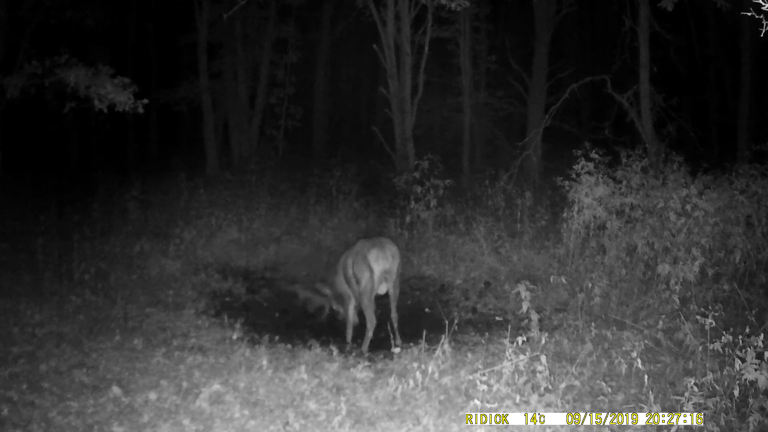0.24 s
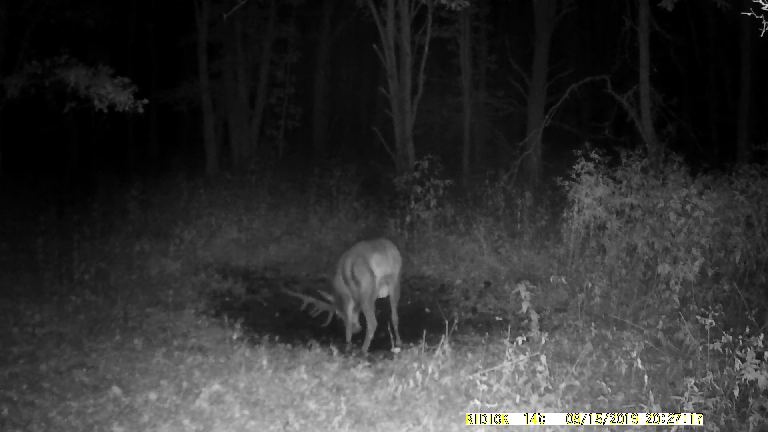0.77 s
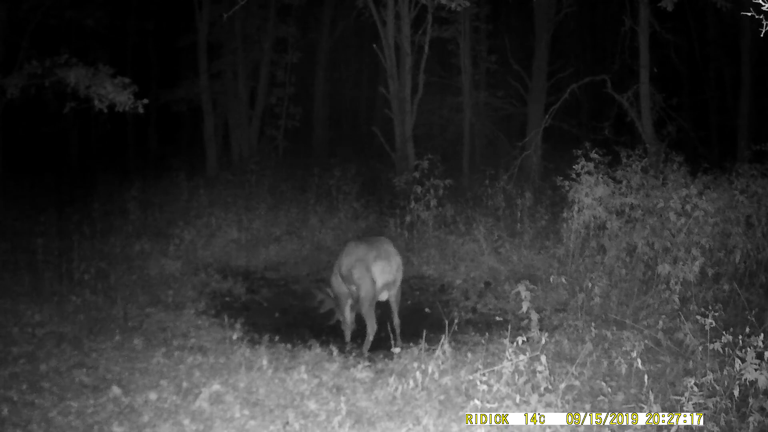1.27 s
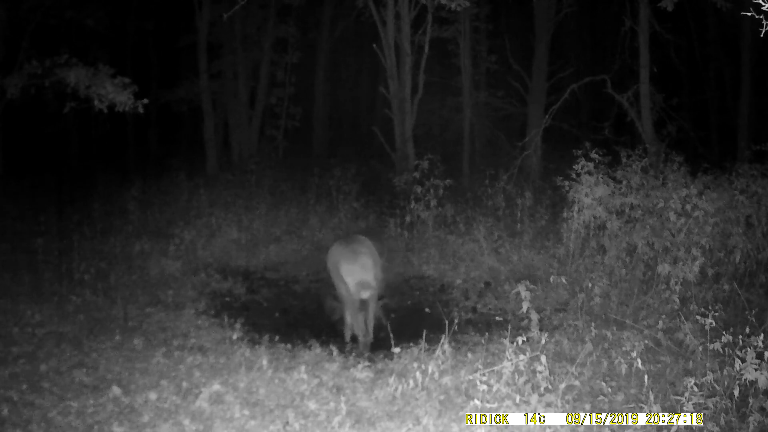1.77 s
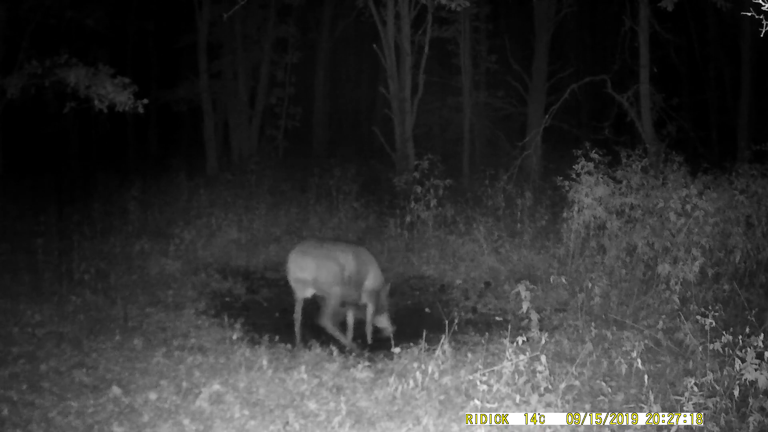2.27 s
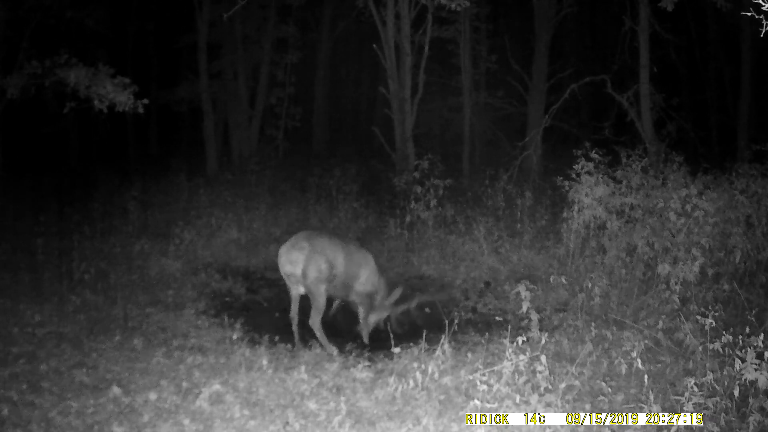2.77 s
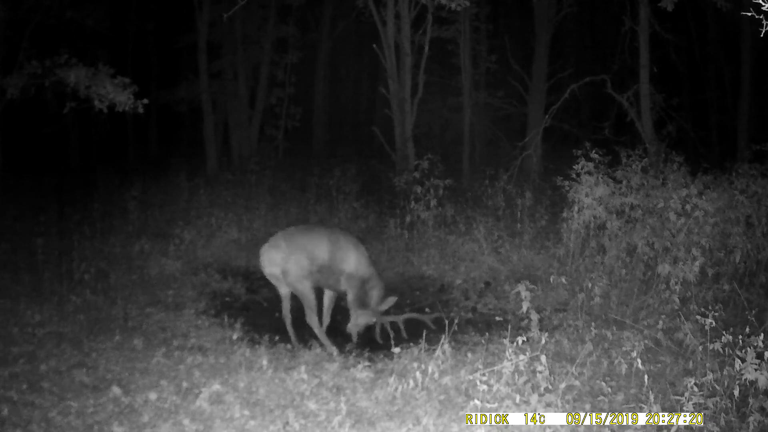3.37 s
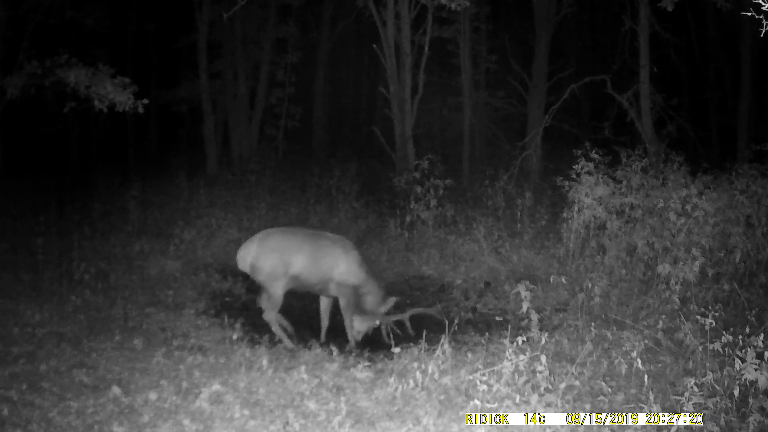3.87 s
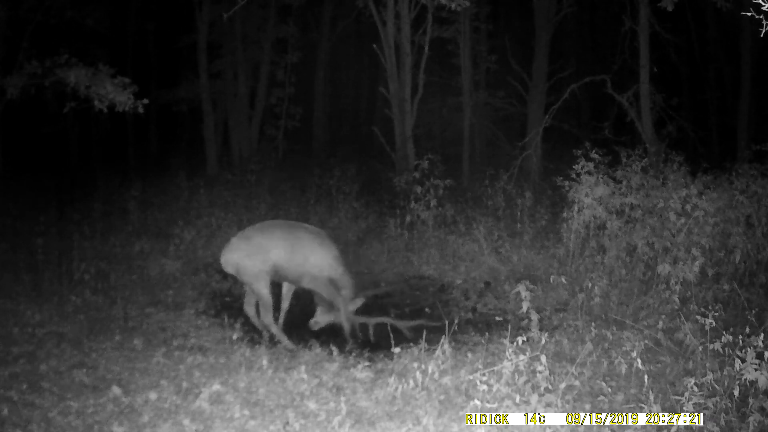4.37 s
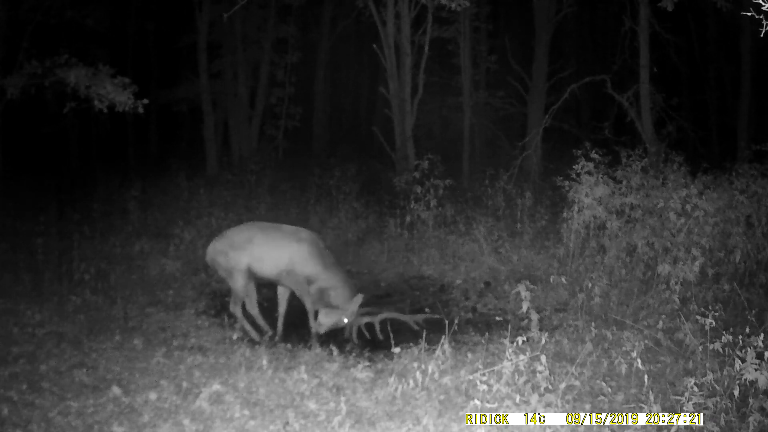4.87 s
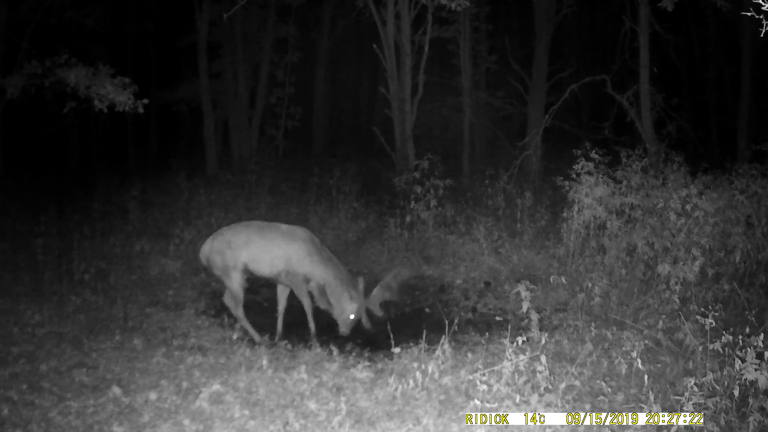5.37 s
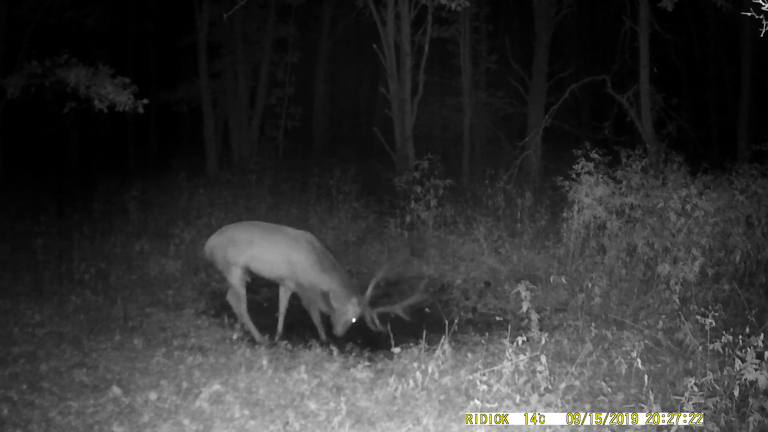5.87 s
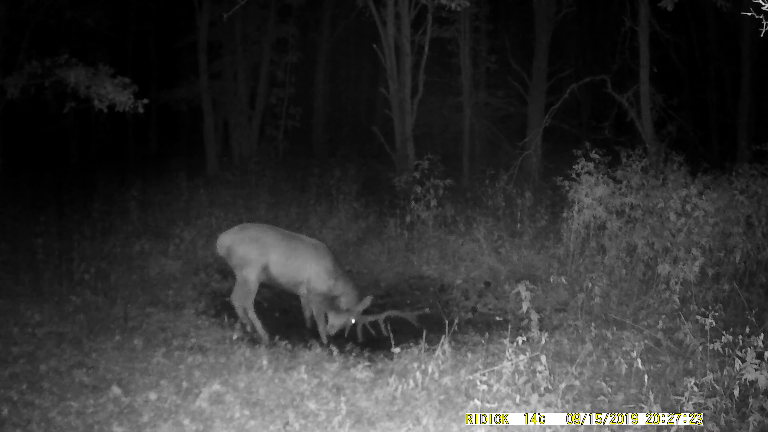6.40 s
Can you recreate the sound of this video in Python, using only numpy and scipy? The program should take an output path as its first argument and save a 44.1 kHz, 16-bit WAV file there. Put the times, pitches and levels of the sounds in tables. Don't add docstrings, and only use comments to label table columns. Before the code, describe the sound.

A bright, buzzy insect chirps about thirteen times a second near the microphone, over quiet hiss and low air rumble in a dark wood. Around it a deer shifts in mud and dry leaves: irregular crunchy scuffs, sharp twig snaps with moist smacks, tiny stalk ticks, antler clicks and muffled hoof knocks. The song breaks twice, returns very faintly and grows, leaving the deer's movements more exposed in the gaps.

```python
import sys
import numpy as np
from scipy import signal
from scipy.fft import rfft, irfft, next_fast_len
from scipy.io import wavfile
from scipy.ndimage import map_coordinates

SR = 44100
rng = np.random.default_rng(int(sys.argv[2]) if len(sys.argv) > 2 else 0)


def digitize_waveform(pressure):
    field = np.atleast_2d(pressure).T
    bounded = np.clip(field, -1, 1)
    quanta = np.round(bounded * 32767).astype(np.int16)
    wavfile.write(sys.argv[1], SR, quanta)


def undo_db(level):
    steps = np.asarray(level, float) / 20
    return 10 ** steps


N = 292824

# pitch_hz, density_db (per Hz)
AIR_COLOUR = [(9, -52), (15, 1), (48, 0.5), (115, -1.5), (260, -6.5), (600, -13.5), (1300, -21),
              (4400, -27), (8500, -18.5), (11500, -24), (13100, -23), (15600, -30)]
# start_s, level_db
AIR_LEVEL = [(0.0, -61.5), (1.5, -60), (3.9, -60.5), (4.99, -63), (6.64, -59.5)]

# start_s (first stroke), period_s (between strokes)
SONG_PHRASES = [
    (-.0265, .0761),
    (3.622, .0775),
    (4.373, .07597),
]
STROKE_COUNTS = [47, 7, 34]
# start_s, level_db
SCRAPE_EFFORT = [(0, -47), (.45, -46), (.7, -48), (1.2, -46.5), (1.5, -44), (1.75, -45.5), (2.0, -46),
                 (3.5, -47), (3.63, -46.5), (4.12, -46), (4.37, -61), (4.45, -53), (4.53, -55),
                 (4.62, -52.5), (4.8, -50), (5.3, -51), (5.55, -48.5), (6.6, -46.5)]
TIRED_S, TIRED_STROKES = .018, 1.6
STROKE_S, LONGER_PER_DB = .041, .017
LENGTH_SCATTER, TIME_SCATTER_S, LEVEL_SCATTER_DB = .045, .001, .3
# delay_s, level_db
NEAR_ECHOES = [
    (.00353, -10),
    (.0071, -17),
]
# pitch_hz, density_db (per Hz)
UNDERGROWTH = [(5000, -12), (6800, -7), (7700, -1), (8550, 1), (9200, -3), (10500, -5), (12000, -8),
               (15000, -12)]

# start_s, level_db
STIRRING = [(0.0, -71), (0.87, -80), (1.03, -68.5), (1.4, -83), (1.63, -62.5), (2.24, -71.5), (2.46, -64.5),
            (3.12, -63), (3.6, -72.5), (3.77, -61), (4.33, -63), (5.25, -71.5), (5.79, -72.5),
            (6.42, -62.5), (6.64, -59.5)]
# start_s, length_s, level_db, wetness_db, rise_s
HOOF_SCUFFS = [(0.909, 0.024, -63, -1, 0.0092), (1.421, 0.083, -50, -9, 0.0055),
               (1.68, 0.065, -52.5, -4.5, 0.0065), (1.943, 0.054, -63.5, -1, 0.012),
               (2.095, 0.056, -64.5, -2, .006), (2.402, 0.097, -67.5, 0, 0.012),
               (2.659, 0.0072, -54, -9, .003), (2.747, 0.066, -64.5, -4, 0.011),
               (2.964, 0.025, -55, 8, 0.0054), (3.003, 0.048, -77, 11, .01),
               (3.204, 0.043, -58, -1, 0.0058), (3.58, 0.043, -65.5, -2.5, 0.0087),
               (3.887, 0.042, -61, 2.5, 0.019), (3.953, 0.023, -63, 1, .01), (4.10, 0.048, -56.5, 0, .004),
               (4.135, 0.037, -58, 4, 0.032), (4.637, 0.088, -62, -23, .006),
               (5.894, 0.063, -65, -17, 0.022), (6.191, 0.051, -57, 2.5, 0.065),
               (6.61, 0.02, -59, -4, 0.0068)]
# pitch_hz, density_db (per Hz)
DRY_LITTER = [(300, -120), (600, -48), (1200, -22.5), (2500, -11.5), (4200, -8), (5300, -2), (6500, -6.5),
              (9000, -11), (12000, -15.5), (16000, -49)]
# pitch_hz, density_db (per Hz)
WET_MUD = [(120, -120), (250, -1), (700, -6), (1500, -0.5), (2500, -6.5), (4000, -4), (8000, -120)]
SWISH_DB, SWISH_FOLLOWS = -6.5, 0.6

# start_s, peak_db, smack_db (against the crack)
TWIG_SNAPS = [(0.8833, -40, -17), (1.403, -33.5, -10), (1.425, -32.5, -9), (1.429, -32, -1),
              (1.4334, -24, -8), (1.443, -32, -32), (1.651, -43.5, 0), (1.6894, -32, -6.5),
              (1.695, -35.5, -1), (1.6988, -30, -12), (2.107, -53, 8), (2.1228, -54, 12),
              (2.4704, -28, -10.5), (2.4731, -32.5, -12), (2.659, -39, -8), (2.9476, -32, -17),
              (2.9754, -38, -10), (3.218, -34.5, -10), (3.241, -40, -7), (3.644, -37.5, -10),
              (3.916, -36.5, -13), (3.9205, -40, -9), (4.099, -48.5, 1), (4.154, -44.5, 2),
              (4.65, -31.5, -16.5), (4.7536, -40, -7), (4.7603, -42, -16), (5.9479, -41, -18),
              (6.227, -51.5, 1), (6.51, -36.5, -4.5)]
# start_s, peak_db
FAINT_SNAPS = [(0.933, -44), (1.0136, -46), (1.3917, -48), (1.4124, -44.5), (1.961, -53), (2.06, -44.5),
               (2.407, -43), (2.484, -40), (2.606, -37.5), (2.778, -39.5), (2.926, -40.5), (3.1336, -39),
               (3.46, -55), (3.602, -43), (3.7, -44), (3.86, -41.5), (4.333, -52), (4.5103, -54),
               (4.565, -66), (4.883, -46.5), (5.139, -49), (5.183, -49.5), (5.321, -46), (5.401, -50),
               (5.746, -48), (5.763, -55.5), (5.9314, -47), (6.4113, -41.5)]
# pitch_hz, density_db (per Hz)
CRACK_COLOUR = [(900, -120), (2500, -25), (3800, -14.5), (5300, -3.5), (6500, -8), (8500, -13.5),
                (12000, -28), (16000, -55)]
# pitch_hz, density_db (per Hz)
SMACK_COLOUR = [(150, -120), (400, -10), (1000, -15), (1600, -6.5), (3000, 0.5), (4200, -14.5),
                (9000, -120)]
FAINT_SMACK_DB, SNAP_T60_S = -16.5, .012

# start_s, peak_db, pitch_hz
ANTLER_TIPS = [
    (1.404, -54, 3200),
    (2.4697, -70, 3320),
    (4.5094, -53, 4180),
    (4.7584, -37, 3300),
    (5.183, -58, 3100),
    (5.8636, -53.5, 3120),
    (5.961, -53, 3100),
    (6.508, -47, 3800),
]
# start_s, peak_db, pitch_hz
MUD_POCKETS = [(1.43, -37.5, 1530), (1.65, -36.5, 1146), (1.6505, -44.5, 600), (1.688, -41, 454),
               (1.697, -44, 800), (2.105, -53, 577), (2.108, -51, 1200), (2.1217, -56, 990),
               (2.416, -50.5, 385), (2.9705, -36.5, 1010), (2.974, -46, 1340), (2.975, -45, 770),
               (2.99, -41, 330), (2.989, -50, 900), (1.69, -49, 280), (3.214, -43, 1370), (3.24, -45, 1640),
               (3.912, -52, 800), (3.917, -49, 306), (3.918, -37.5, 510), (3.922, -45, 570),
               (4.154, -44, 1000), (4.156, -37, 1500), (5.949, -57, 1470), (5.962, -53, 1390)]
# start_s, peak_db, pitch_hz
HOOF_KNOCKS = [
    (1.4317, -39.5, 1380),
    (2.9784, -48, 1380),
    (3.919, -41, 1465),
    (4.114, -54, 1290),
    (4.129, -48.5, 1540),
    (4.185, -53, 1450),
    (6.25, -54, 1600),
    (6.271, -52, 1740),
]
POCKET_T60_S, LARGER_LONGER, POCKET_RISE = .015, .3, 6
TIP_T60_S, KNOCK_T60_S = 0.016, 0.019

TOP_HZ = 15720


def unit(x):
    return x / np.sqrt(np.mean(x ** 2) + 1e-20)


def along(points, hz):
    f, v = np.transpose(points)
    return np.interp(np.log(hz + 1), np.log(f + 1), v)


def level_curve(rows):
    s, db = np.transpose(rows)
    return np.interp(np.arange(N) / SR, s, db)


def wobble(rate):
    knots = rng.standard_normal(int(N * rate / SR) + 4)
    return map_coordinates(knots, [np.arange(N) * rate / SR])


def filtered(x, response):
    m = next_fast_len(len(x) + 8192)
    return irfft(rfft(x, m) * response(np.fft.rfftfreq(m, 1 / SR)), m)[:len(x)]


def coloured(x, spectrum):
    return filtered(x, lambda hz: undo_db(along(spectrum, hz)))


def air():
    level_db = level_curve(AIR_LEVEL) + 0.39 * wobble(4.7)
    return undo_db(level_db) * unit(coloured(rng.standard_normal(N), AIR_COLOUR))


def strokes():
    order = np.concatenate([np.arange(n) for n in STROKE_COUNTS])
    left = np.concatenate([np.arange(n)[::-1] for n in STROKE_COUNTS])
    first, period = np.repeat(SONG_PHRASES, STROKE_COUNTS, axis=0).T
    chance = rng.standard_normal((len(order), 3))
    start = first + period * order + TIRED_S * np.exp(-left / TIRED_STROKES)
    start = start + TIME_SCATTER_S * chance[:, 0]
    db = np.interp(start, *np.transpose(SCRAPE_EFFORT)) + LEVEL_SCATTER_DB * chance[:, 1]
    length = STROKE_S * np.exp(LONGER_PER_DB * (db + 47) + LENGTH_SCATTER * chance[:, 2])
    return np.array([start, db, length])[..., None]


def wing_clicks(teeth=14):
    start, db, length = strokes()
    chance = rng.standard_normal((len(start), 4, teeth))
    gaps = (1 + 3.6 * np.linspace(0, 1, teeth) ** 2.2) * np.exp(.17 * chance[:, 0])
    late = np.cumsum(gaps, axis=1) - gaps[:, :1]
    late = late / late[:, -1:] * length
    swell_db = -17 * np.clip(1 - late / .01, 0, 1) - 3 * np.clip(1 - late / .02, 0, 1)
    swell_db = swell_db - 2.5 * (late / length) ** 8
    size = undo_db(db + 1.3 * chance[:, 2] + swell_db)[..., None]
    droop_hz = 750 * np.clip((db + 57) / 6, 0, 1) * late / length
    wing_hz = (9830 - droop_hz + 260 * chance[:, 1])[..., None]

    def ring(t):
        return np.exp(-.5 * (t / .000118) ** 2) * np.sin(2 * np.pi * wing_hz * t)

    t = np.arange(-20, 50) / SR
    tick = undo_db(-16) * np.exp(-.5 * (t / .0001) ** 2) * np.sin(2 * np.pi * 6600 * t)
    rebound = t - .000475 - .00003 * chance[:, 3, :, None]
    answer = np.clip(.3 + late / .02, 0, 1.1)[..., None]
    shape = size * (ring(t) + tick + answer * ring(rebound))
    index = np.round((start + late) * SR).astype(int)[..., None] + np.arange(len(t))
    heard = (index >= 0) & (index < N)
    return np.bincount(index[heard], shape[heard], N)


def cricket():
    clicks = wing_clicks()

    def echoes(hz):
        return 1 + sum(undo_db(g) * np.exp(-2j * np.pi * hz * s) for s, g in NEAR_ECHOES)

    near = filtered(clicks, echoes)
    t = np.arange(SR // 2) / SR
    fade = undo_db(-1.5 - 60 * t / .09) + undo_db(-9.5 - 60 * t / .6)
    tail = coloured(rng.standard_normal(len(t)), UNDERGROWTH) * fade * (t > .0008)
    tail *= undo_db(-9) / np.linalg.norm(tail)
    return undo_db(12.0) * (near + signal.fftconvolve(clicks, tail)[:N])


def drag():
    level_db, t = level_curve(STIRRING), np.arange(N) / SR
    dry = undo_db(level_db)
    wet = undo_db(SWISH_DB - 68 + SWISH_FOLLOWS * (level_db + 64.5))
    for s, length, db, wetness_db, rise in HOOF_SCUFFS:
        along_scuff = np.clip((t - s - rise) / length, 0, None)
        shape = np.clip((t - s) / rise, 0, 1) * undo_db(db - 4.75 * along_scuff ** 2)
        dry += shape
        wet += shape * undo_db(wetness_db - 7)
    grains = (rng.random(N) < 2200 / SR) * undo_db(1.5 * rng.exponential(size=N)) * rng.standard_normal(N)
    crackle = unit(coloured(0.89 * unit(grains) + rng.standard_normal(N), DRY_LITTER))
    swish = unit(coloured(0.92 * unit(grains[::-1]) + rng.standard_normal(N), WET_MUD))
    return undo_db(1.8 * wobble(50)) * dry * crackle + undo_db(3 * wobble(90)) * wet * swish


def breaking(rows, lead=SR // 500):
    out, t = np.zeros(N + SR), np.arange(SR // 10) / SR
    fade = undo_db(-60 * t / SNAP_T60_S) + undo_db(-14.5 - 60 * t / 0.047)
    for s, db, smack_db in rows:
        spatter = rng.standard_normal(len(t)) * fade
        spatter[0] += 4
        spatter = np.pad(spatter, (lead, 0))[:len(t)]
        crack, smack = coloured(spatter, CRACK_COLOUR), coloured(spatter, SMACK_COLOUR)
        burst = crack / np.abs(crack).max() + undo_db(smack_db) * smack / np.abs(smack).max()
        out[round(s * SR) - lead:][:len(t)] += undo_db(db) * burst
    return out[:N]


def snaps():
    return breaking(TWIG_SNAPS)


def faint_snaps():
    return breaking([(s, db, FAINT_SMACK_DB) for s, db in FAINT_SNAPS])


def ringing(rows, count=3):
    out, t = np.zeros(N + SR), np.arange(SR // 10) / SR
    for s, db, hz, t60, rise in rows:
        for k, (wait, smaller) in enumerate(rng.random((count, 2))):
            age = np.clip(t - 0.00303 * k * wait, 0, None)
            pitch = hz * np.exp(.4 * k * (smaller - .5))
            phase = 2 * np.pi * pitch * (age + rise * age ** 2)
            level = undo_db(db + 2.5 - 5.4 * k - 60 * age / t60) * (1 - np.exp(-age / 0.00036))
            out[round(s * SR):][:len(t)] += level * np.sin(phase)
    return filtered(out[:N], lambda hz: (1j * hz / (170 + 1j * hz)) ** 2)


def antler_clicks():
    return ringing([(*row, TIP_T60_S, 0) for row in ANTLER_TIPS])


def plops():
    return ringing([(s, db, hz, POCKET_T60_S * (1000 / hz) ** LARGER_LONGER, POCKET_RISE)
                    for s, db, hz in MUD_POCKETS])


def knocks():
    return ringing([(*row, KNOCK_T60_S, 0) for row in HOOF_KNOCKS])


def scene():
    deer = drag() + snaps() + faint_snaps() + antler_clicks() + plops() + knocks()
    return (air() + cricket() + deer)[None]


def band_limit(x):
    return signal.sosfilt(signal.butter(12, 15720, fs=SR, output="sos"), x)


def record(dry):
    mix = filtered(dry[0], lambda hz: hz < TOP_HZ)[None]
    return band_limit(mix)


dry = scene()
out = record(dry)
digitize_waveform(out)
```